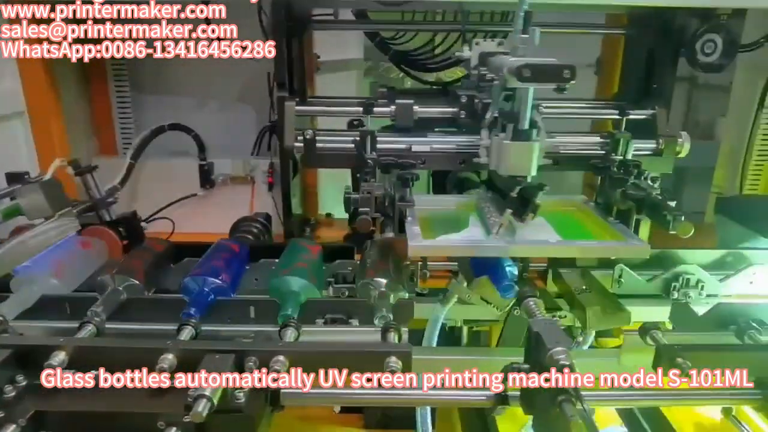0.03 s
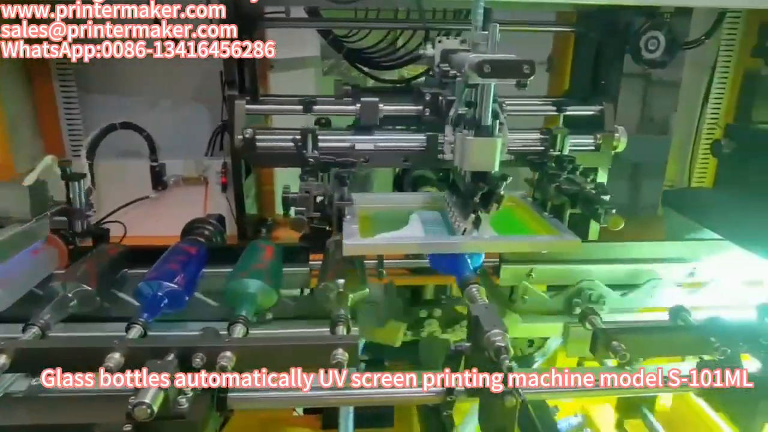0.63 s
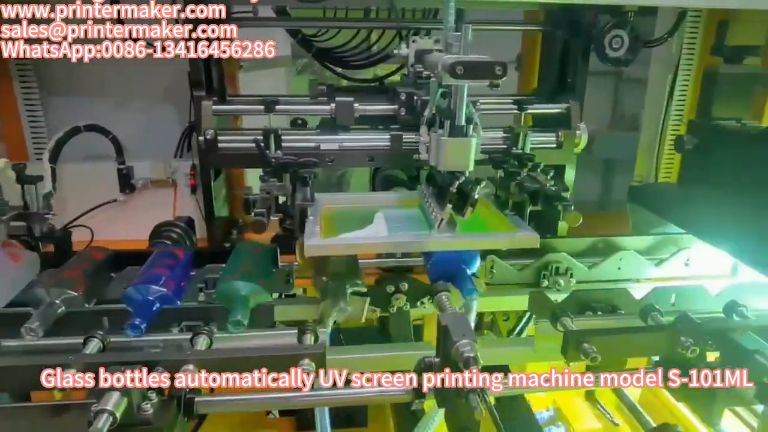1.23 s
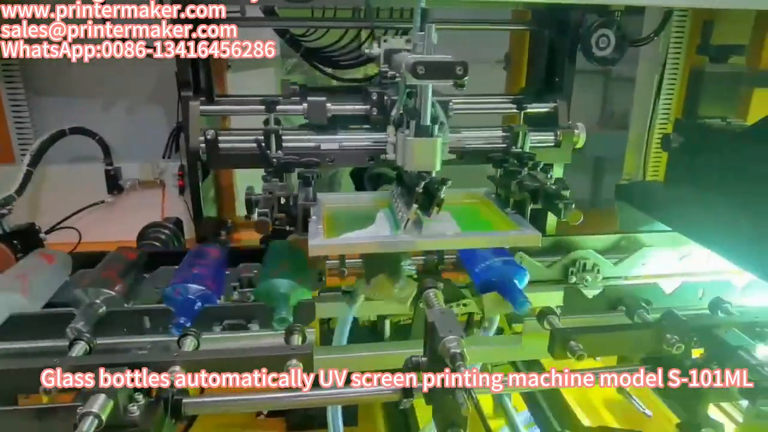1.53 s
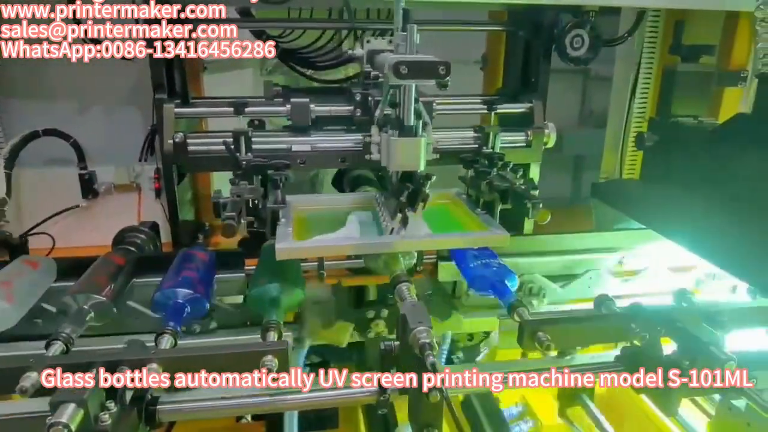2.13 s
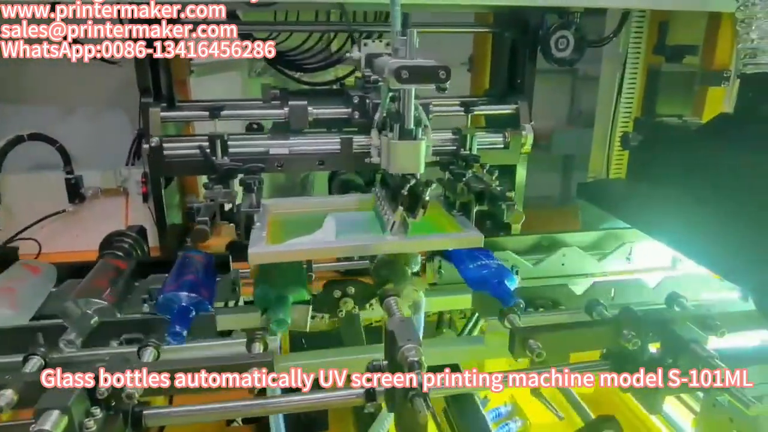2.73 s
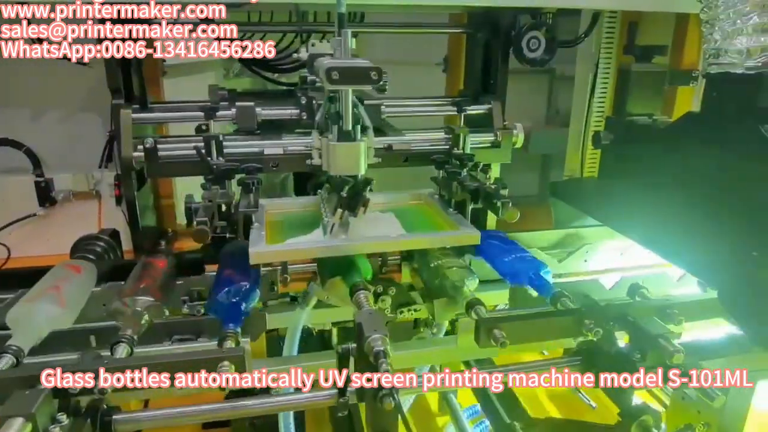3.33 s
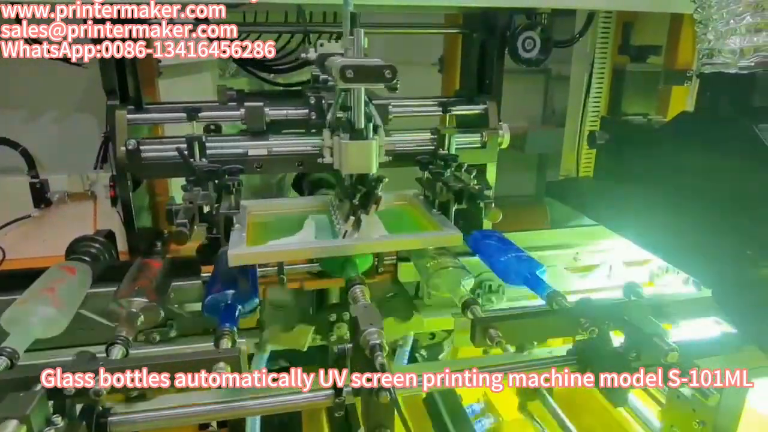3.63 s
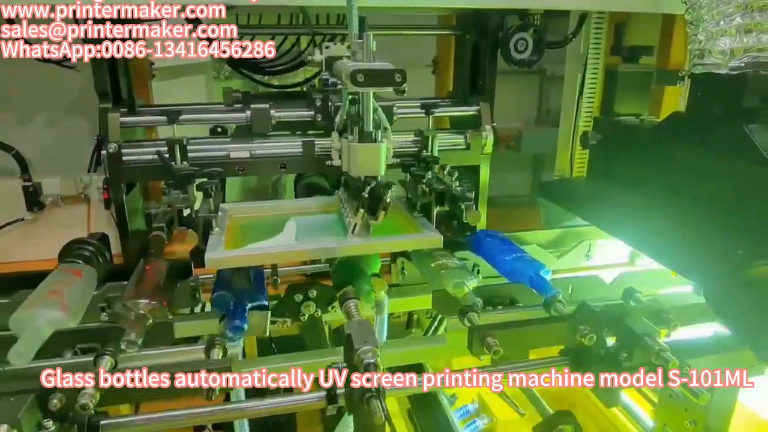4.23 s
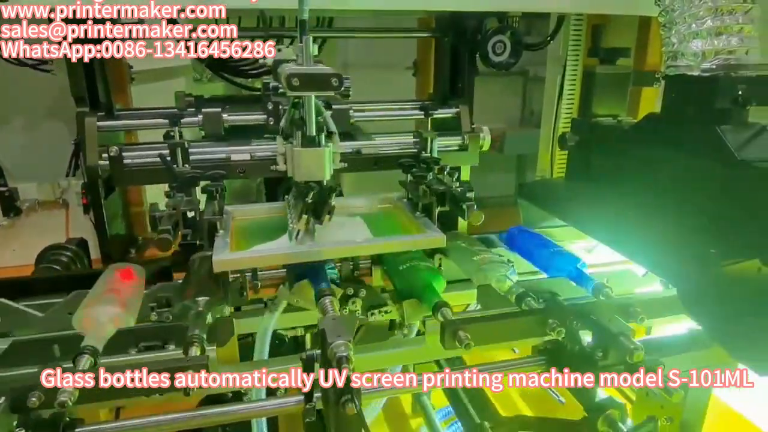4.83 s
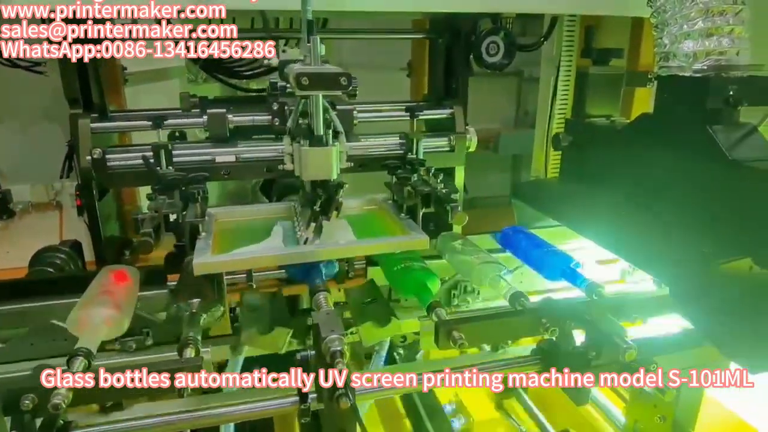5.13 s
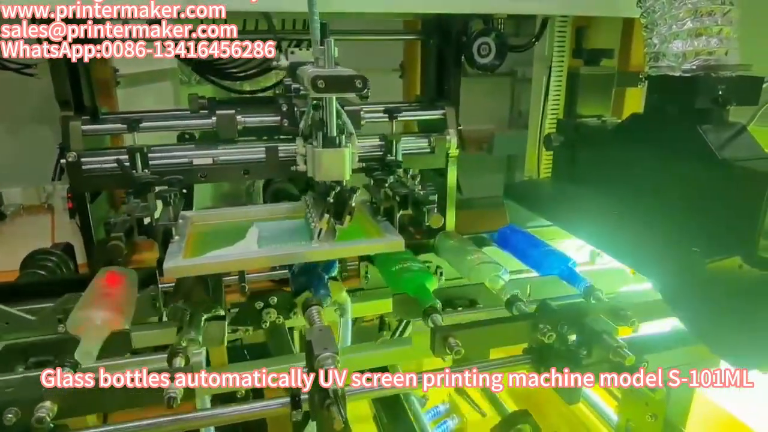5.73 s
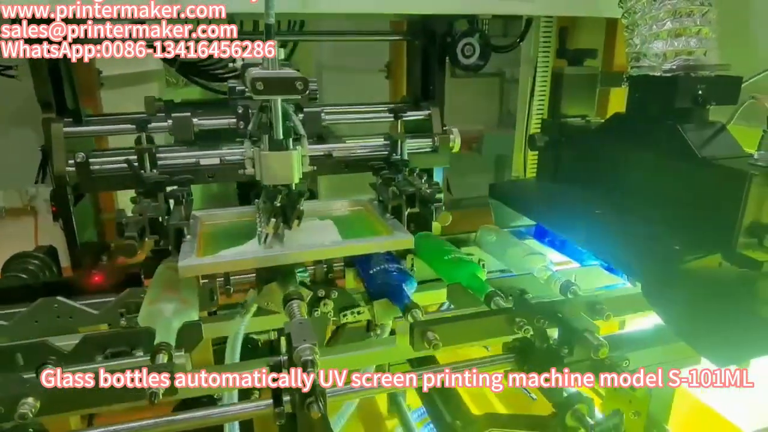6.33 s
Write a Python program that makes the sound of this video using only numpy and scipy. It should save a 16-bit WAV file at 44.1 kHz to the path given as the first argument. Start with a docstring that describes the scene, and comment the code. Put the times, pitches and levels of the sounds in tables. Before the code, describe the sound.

A pneumatic machine printing on glass bottles repeats its cycle about every second and a half. Air hisses, two valves spit sharply with tiny falling whistles, and a carriage clacks and rumbles along its rails. Half a cycle later the valves spit again and the carriage returns with a soft knock. Bottles occasionally give brief squeaks. It is heard from close by, over faint fans and electrical hum in a factory hall.

```python
"""A pneumatic screen printer for glass bottles cycles every 1.5 s over hall fans and mains hum.
The air supply opens with a soft knock and hisses. On the forward stroke two valves spit, each with a
falling whistle, air seeps past a spool and a cylinder vents; the carriage clacks, rumbles and sings
along its rails, and bottles squeak in their holders. Half a cycle later the supply is cut, the valves
spit and whistle again, the cylinder vents and the carriage knocks softly and rumbles back."""
import sys
import numpy as np
from scipy import signal
from scipy.fft import rfft, irfft
from scipy.io import wavfile
from scipy.ndimage import uniform_filter1d

SR = 44100
rng = np.random.default_rng(int(sys.argv[2]) if len(sys.argv) > 2 else 0)


def store_wav(level_fs):
    """Save 16-bit WAV to argv[1]."""
    pcm = np.round(np.clip(np.atleast_2d(level_fs), -1, 1) * 32767)
    wavfile.write(sys.argv[1], SR, pcm.T.astype(np.int16))


N = 285327
TIME_S = np.arange(N) / SR
BINS_HZ = np.fft.rfftfreq(N, 1 / SR)

# forward strokes: start_s, first_valve_db, second_valve_db, vent_db, supply_hiss_db
FORWARD_STROKES = [(0.0, -15.5, -13, -22.5, -32.5), (1.546, -14.5, -16.5, -19, -35),
                   (3.097, -15, -17.5, -26, -35.5), (4.636, -14, -16.5, -25, -36.5),
                   (6.185, -14, -15.5, -22, -36.5)]
# return strokes: start_s, first_valve_db, second_valve_db, vent_db
RETURN_STROKES = [(0.731, -18, -17, -18), (2.276, -20.5, -16, -20.5), (3.823, -18.5, -15.5, -20),
                  (5.37, -20.5, -24.5, -21)]
# metalwork around the valves: centre_hz, width_hz, lift_db
METAL_MODES = [(1060, 70, 5), (1645, 70, 7), (2172, 40, 9), (2710, 80, 3), (2862, 45, 8), (3020, 50, 4),
               (3196, 60, 7), (3302, 40, 5), (3945, 70, 4), (4362, 70, 4), (5320, 70, 2), (5478, 70, 5),
               (5770, 110, 3), (6380, 160, 4), (7130, 80, 3), (8300, 110, 3)]


def gain(db):
    """Decibels to amplitude."""
    return 10 ** (np.asarray(db) / 20)


def unit_rms(x):
    """Scales to rms 1."""
    return x / np.sqrt(np.mean(x ** 2) + 1e-20)


def curve_at(points, hz=BINS_HZ):
    """Interpolates on a log frequency axis."""
    points_hz, values = np.transpose(points)
    return np.interp(np.log(hz + 1), np.log(points_hz + 1), values)


def lift_db(modes):
    """Summed lift of resonances per bin."""
    return sum(db / (1 + (2 * (BINS_HZ - hz) / width_hz) ** 2) for hz, width_hz, db in modes)


def coloured(x, colour_db):
    """Filters by a gain per bin; rms 1."""
    return unit_rms(irfft(rfft(x) * gain(colour_db), N))


def noise(colour_db):
    """Coloured noise; rms 1."""
    return coloured(rng.standard_normal(N), colour_db)


def wander(rate_hz):
    """Random drift up to about rate_hz; rms 1."""
    return unit_rms(irfft(rfft(rng.standard_normal(N)) / (1 + (BINS_HZ / rate_hz) ** 4), N))


def patchy(x, depth_db):
    """Uneven, flickering texture: neighbouring bands swell and sink at random; rms 1."""
    spectra = signal.stft(x, nperseg=1024, noverlap=768)[2]
    patches = uniform_filter1d(rng.standard_normal(spectra.shape), size=5, axis=0)
    patches = unit_rms(uniform_filter1d(patches, size=8, axis=1))
    return unit_rms(signal.istft(spectra * gain(depth_db * patches), nperseg=1024, noverlap=768)[1][:N])


def ramp(start_s, length_s, top=1):
    """Rises by 1 per length_s, from 0 to top."""
    return np.clip((TIME_S - start_s) / length_s, 0, top)


def burst(start_s, length_s, rise_s, t60_s):
    """Envelope: rise, hold, decay."""
    return ramp(start_s, rise_s) * gain(-60 * ramp(start_s + length_s, t60_s, top=2))


def strokes(forward, back):
    """Pairs each stroke with the setting for its direction."""
    return [(row, forward) for row in FORWARD_STROKES] + [(row, back) for row in RETURN_STROKES]


def hall(hum_hz=99.7, hum_db=-60):
    """Fans and other machines sound through ducts, over a wavering mains hum."""
    spectrum = [(25, -45), (60, -22), (80, -11), (100, 0), (170, -0.5), (300, -6.5), (450, -9), (700, -20),
                (1100, -7), (1800, -18), (3700, -16), (6200, -10.5), (9000, -19), (13000, -30)]  # freq_hz, level_db
    duct_modes = [(534, 88, 11), (665, 40, 13), (1000, 40, 4), (1310, 18, -5), (1528, 76, 10.5),
                  (2270, 660, 8.5), (2560, 100, -2), (3240, 24, 12), (8170, 370, 6.5)]  # centre_hz, width_hz, lift_db
    fan_levels = [(0, -45), (1.3, -45.5), (2.8, -47.5), (4.4, -48.5), (6.4, -50)]  # time_s, level_db
    fans = patchy(noise(curve_at(spectrum) + lift_db(duct_modes)), depth_db=2.5)
    fans *= gain(np.interp(TIME_S, *np.transpose(fan_levels)) + .5 * wander(14))
    hum = np.sin(2 * np.pi * np.cumsum(hum_hz + 1.2 * wander(4)) / SR) * (1 + .4 * wander(5))
    return fans + gain(hum_db) * unit_rms(hum)


def supply_hiss(lead_s=.143, open_s=.885, build_s=.13):
    """Air leaks while the supply is open, swelling as pressure builds."""
    spectrum = [(1500, -15), (3700, -13.5), (4800, -5), (6100, 4.5), (7000, 2.5), (8200, -0.5),
                (10800, -2.5), (11800, -12), (14000, -2.5)]  # freq_hz, level_db
    flow = np.zeros(N)
    for stroke_s, *_, db in FORWARD_STROKES:
        on_s = stroke_s - lead_s
        swell_db = -8 * (1 - ramp(on_s, build_s))
        flow += gain(db + swell_db) * burst(on_s, open_s, rise_s=.019, t60_s=.12)
    hiss = patchy(noise(curve_at(spectrum)), depth_db=1.8)
    return flow * hiss * gain(.5 * wander(30))


def carriage(delay_s=.054, roll_s=.15, roll_db=-48.5, idle_db=-58, rise_s=.05):
    """Bearings rumble on each stroke and loaded run, then coast; on a run the slide sings."""
    rumble_spectrum = [(40, -34), (80, -11), (105, 5), (170, 1), (240, -0.5), (380, -5), (600, -13.5),
                       (900, -14), (1500, -26), (3000, -19.5), (8000, -51)]  # freq_hz, level_db
    slide_modes = [(705, 170, -1.5), (1142, 84, 2.5), (1463, 43, 3.5), (2170, 750, -6.5)]  # centre_hz, width_hz, level_db
    loaded_runs = [(.06, 0.43, -47.5, -42.5), (1.605, 0.16, -41, -59), (3.36, 0.2, -44.5, -62),
                   (6.23, .07, -38.5, -51)]  # start_s, length_s, rumble_db, song_db
    moves = [(stroke_s + delay_s, roll_s, roll_db) for stroke_s, *_ in FORWARD_STROKES + RETURN_STROKES]
    power = gain(idle_db) ** 2
    for start_s, length_s, db, *_ in moves + loaded_runs:
        power += (gain(db) * burst(start_s, length_s, rise_s, t60_s=1.31)) ** 2
    rumble = patchy(noise(curve_at(rumble_spectrum)), depth_db=2.5)
    rumble *= np.sqrt(power) * gain(1.7 * wander(18))
    resonance = sum(gain(db) / (1 + (2 * (BINS_HZ - hz) / width_hz) ** 2)
                    for hz, width_hz, db in slide_modes)
    song = patchy(noise(20 * np.log10(resonance)), depth_db=2.8)
    song *= sum(gain(db) * burst(start_s, length_s / 2, rise_s, t60_s=3.4)
                for start_s, length_s, _, db in loaded_runs)
    return rumble + song


def spool_seep(t60_s=.17):
    """Turbulent air swells as a spool starts to move and flows while it shifts."""
    spectrum = [(900, -15), (1700, -14.5), (2250, 1), (3000, -11.5), (3800, -1), (4800, 2), (6200, 10),
                (7500, 8.5), (9500, -5.5), (14000, -13)]  # freq_hz, level_db
    # full flow: delay_s, level_db, build_s, hold_s
    forward_seep = (0, -29.5, 0.0417, .13)
    back_seep = (0.04, -27, 0.0086, .11)
    flow = np.zeros(N)
    for (stroke_s, *_), (delay_s, db, build_s, hold_s) in strokes(forward_seep, back_seep):
        full_s = stroke_s + delay_s
        swell = np.exp(np.clip((TIME_S - full_s) / build_s, -20, 0))
        flow += swell * gain(db - 60 * ramp(full_s + hold_s, t60_s, top=2))
    return flow * noise(curve_at(spectrum) + lift_db(METAL_MODES)) * gain(.72 * wander(94))


def bottle_squeaks():
    """Glass sticks and slips unevenly as it is gripped; near 4 s a metal part rings at 1640 Hz after the
    cylinder vents."""
    slips = [(0.061, 0.011, 5700, -22), (1.604, 0.034, 3193, -24), (1.674, 0.031, 3196, -33),
             (3.075, 0.042, 5300, -28.5), (3.139, 0.019, 5290, -23), (3.985, 0.03, 1640, -38),
             (4.699, 0.03, 10950, -30), (4.702, 0.0068, 5570, -25.5), (6.24, .018, 5770, -24)]  # start_s, length_s, pitch_hz, level_db; the 1640 Hz row is metal ringing after a vent
    wavering_time_s = np.cumsum(1 + .014 * wander(500)) / SR
    flutter = 1 + .5 * wander(150)
    out = np.zeros(N)
    for start_s, length_s, hz, db in slips:
        envelope = gain(db) * burst(start_s, length_s, rise_s=.004, t60_s=.045)
        out += envelope * np.sin(2 * np.pi * hz * wavering_time_s)
    return out * flutter


def clacks(knocks_per_s=600, t60_s=.089, thud_rise_s=.022, supply_lead_s=.137):
    """Loose metal chatters against a stop; the heavy frame follows with a thud."""
    frame_spectrum = [(50, -24), (110, -4), (300, -0.5), (560, 4), (800, -4.5), (1400, -6), (2300, 3.5),
                      (3100, -3.5), (3900, -10), (5500, 6.5), (7000, 3), (10000, -13), (14000, -22)]  # freq_hz, level_db
    stop_hits = [(.055, -23.5, 0.036, 0.5), (1.602, -31.5, 0.047, 0.32), (1.68, -38, 0.017, 0),
                 (3.14, -35.5, 0.021, 0.42), (3.343, -31, .03, 0.57), (3.38, -23.5, 0.026, 1),
                 (3.42, -36.5, 0.019, 0.14), (4.683, -39.5, 0.065, 0.6), (6.245, -24, 0.034, 0.85),
                 (6.295, -37, .03, 0.55)]  # start_s, level_db, length_s, hardness (0-1)
    return_knock = (0.05, -46.5, 0.09, 0.5)  # delay_s, level_db, length_s, hardness (0-1)
    knocks = rng.standard_normal(N) * (rng.random(N) < knocks_per_s / SR)
    chatter = patchy(unit_rms(knocks) + rng.standard_normal(N), depth_db=2.2)
    frame_db = curve_at(frame_spectrum)
    octaves = np.log2(np.maximum(BINS_HZ, 500) / 1000)
    rattle = coloured(chatter, frame_db + octaves)
    thud = coloured(chatter, frame_db - 3 * octaves)
    delay_s, *knock = return_knock
    return_knocks = [(stroke_s + delay_s, *knock) for stroke_s, *_ in RETURN_STROKES]
    supply_knocks = [(stroke_s - supply_lead_s, -45, .015, 0) for stroke_s, *_ in FORWARD_STROKES]
    out = np.zeros(N)
    for start_s, db, length_s, hardness in stop_hits + return_knocks + supply_knocks:
        out += gain(db) * hardness * burst(start_s, length_s, .0021, t60_s) * rattle
        rise_s = min(thud_rise_s, length_s / 2)
        out += gain(db + 2) * (1 - hardness) * burst(start_s, length_s, rise_s, 2.14 * t60_s) * thud
    return out


def cylinder_vents(split_hz=3800, sag_db=-5):
    """A silencer fizzes; the lower rush follows as the piston gets going, then both ebb."""
    spectrum = [(60, -48), (400, -29), (750, -20), (1050, -14.5), (1300, -17), (1650, -12), (2250, -9),
                (3200, -8.5), (4500, -6), (5500, 1.5), (6400, 1), (7500, -7), (9600, -5), (10800, -17),
                (14000, -67)]  # freq_hz, level_db
    # exhaust timing: delay_s, length_s, rush_rise_s
    forward_vent = (0.034, 0.033, 0.023)
    back_vent = (.09, .077, 0.053)
    air = patchy(noise(curve_at(spectrum) + lift_db(METAL_MODES)), depth_db=4) * gain(wander(220))
    rush = irfft(rfft(air) / (1 + (BINS_HZ / split_hz) ** 6), N)
    fizz = air - rush
    out = np.zeros(N)
    for (stroke_s, _, _, db, *_), (delay_s, length_s, rush_rise_s) in strokes(forward_vent, back_vent):
        start_s = stroke_s + delay_s
        t60_s = 5 * length_s  # a larger cylinder empties more slowly
        fizz_db = db + sag_db * ramp(start_s, length_s)
        out += gain(fizz_db) * burst(start_s, length_s, .016, t60_s) * fizz
        out += gain(db + 2) * burst(start_s, length_s, rush_rise_s, t60_s) * rush
    return out


def port_whistles():
    """A port's edge tone falls with the pressure, lingers halfway and breaks up."""
    # emptying valves: delay_s, length_s, start_hz, end_hz, level_db
    forward_ports = [(.003, .018, 8500, 5400, -18), (.109, .018, 9300, 6500, -20)]
    back_ports = [(.006, .042, 8400, 4200, -12.5), (.115, .014, 10100, 6800, -17)]
    stages, pitch_fall, fade_db = [0, .28, .6, 1], [0, .42, .52, 1], [0, 0, -3, -15]
    waver, flutter = 1 + .04 * wander(900), 1 + .5 * wander(250)
    out = np.zeros(N)
    for (stroke_s, *_), ports in strokes(forward_ports, back_ports):
        for delay_s, length_s, start_hz, end_hz, db in ports:
            start_s = stroke_s + delay_s
            progress = ramp(start_s, length_s)
            hz = start_hz + (end_hz - start_hz) * np.interp(progress, stages, pitch_fall)
            flow = gain(db + np.interp(progress, stages, fade_db))
            flow *= burst(start_s, length_s, rise_s=.002, t60_s=.015)
            out += flow * np.sin(2 * np.pi * np.cumsum(hz * waver) / SR)
    return out * flutter


def valve_spits(sag_db=-3, trail_db=-18):
    """Each valve dumps its pilot air in a sharp, sagging spit with a weaker trail."""
    spectrum = [(700, -48), (1600, -25.5), (2200, -15), (3400, -12), (4600, -3.5), (5500, 4), (6800, 2),
                (8900, 4.5), (9700, -2.5), (11500, -10), (14000, -12.5)]  # freq_hz, level_db
    # two valves per stroke: delay_s, length_s
    forward_spits = [(0, 0.012), (.107, .013)]
    back_spits = [(0, 0.026), (.113, .012)]
    # extra spit as the carriage jolts: start_s, level_db, length_s
    jolt_spit = (3.379, -19.5, .008)
    firings = [(stroke_s + delay_s, db, length_s)
               for (stroke_s, first_db, second_db, *_), spits in strokes(forward_spits, back_spits)
               for db, (delay_s, length_s) in zip((first_db, second_db), spits)]
    flow = np.zeros(N)
    for start_s, db, length_s in firings + [jolt_spit]:
        spit = burst(start_s, length_s, rise_s=.004, t60_s=.07) * gain(sag_db * ramp(start_s, length_s))
        trail = gain(trail_db) * burst(start_s, length_s, rise_s=.045, t60_s=.54)
        flow += gain(db) * (spit + trail)
    air = patchy(noise(curve_at(spectrum) + .22 * lift_db(METAL_MODES)), depth_db=6)
    return flow * air * gain(1.5 * wander(200))


def room(x, near_db=-10, tail_db=-12, build_s=.043):
    """Nearby panels reflect; the hall's tail follows, with the metalwork ringing in it."""
    decay_times = [(100, 1), (1000, 0.65), (3200, 0.5), (7000, 0.37), (13000, 0.4)]  # freq_hz, t60_s
    near = np.zeros(SR)
    near[rng.integers(60, 900, size=10)] = rng.choice([-1., 1.], size=10)
    scatter = rng.standard_normal(SR) * (rng.random(SR) < .1)
    hz, age_s, spectra = signal.stft(scatter, SR, nperseg=256)
    envelope = gain(-60 * age_s / curve_at(decay_times, hz)[:, None]) * np.minimum(age_s / build_s, 1)
    tail = signal.istft(spectra * envelope, SR, nperseg=256)[1][:SR]
    tail = irfft(rfft(tail, N) * gain(.19 * lift_db(METAL_MODES)), N)[:SR]
    echoes = gain(near_db) * near / np.linalg.norm(near) + gain(tail_db) * tail / np.linalg.norm(tail)
    return x + signal.fftconvolve(x, echoes)[:N]


def scene():
    """The printer in its hall, alike in both channels."""
    echoing = room(valve_spits() + spool_seep() + cylinder_vents() + clacks() + bottle_squeaks())
    mono = echoing + port_whistles() + supply_hiss() + carriage() + hall()
    return np.array([mono, mono])


def record(dry, knee_db=-24, duck_db_per_db=.25, recovery_db_per_s=90, cutoff_hz=14120):
    """Gain control ducks the mix at each loud spit; a low-pass follows."""
    power_db = 10 * np.log10(abs(uniform_filter1d(dry[0] ** 2, size=300)) + 1e-12)
    recovery_db = TIME_S * recovery_db_per_s
    held_db = np.maximum.accumulate(power_db + recovery_db) - recovery_db
    over_db = np.maximum(held_db - knee_db, 0)
    ducked = dry / gain(duck_db_per_db * uniform_filter1d(over_db, size=200))
    lowpass = signal.firwin(401, cutoff_hz, window=("kaiser", 9), fs=SR)
    return signal.oaconvolve(ducked, lowpass[None], "same")


dry = scene()
out = record(dry)
store_wav(out)
```